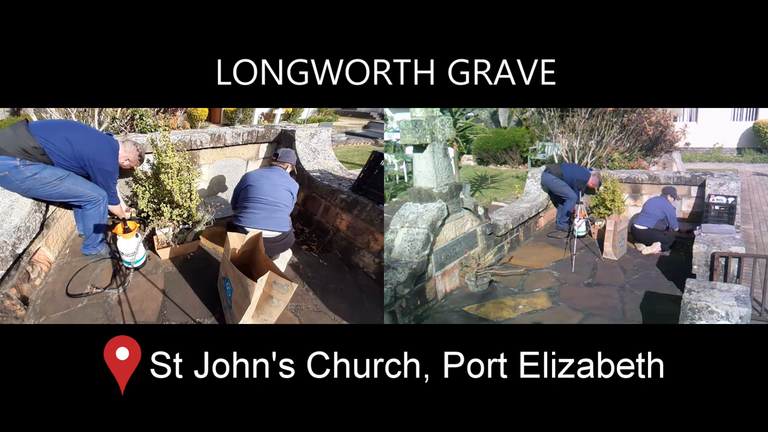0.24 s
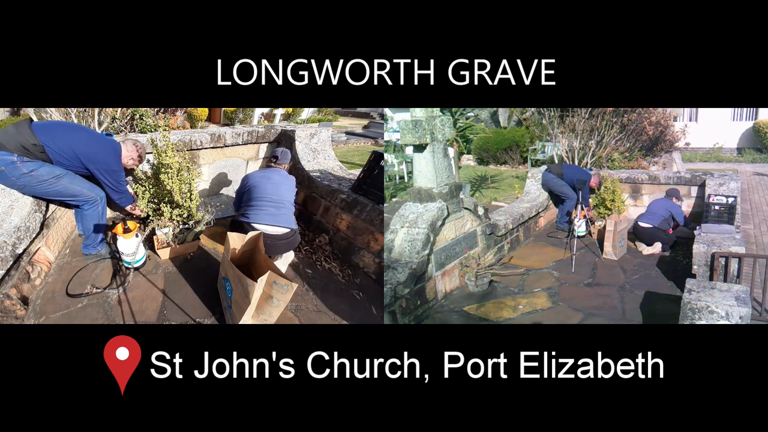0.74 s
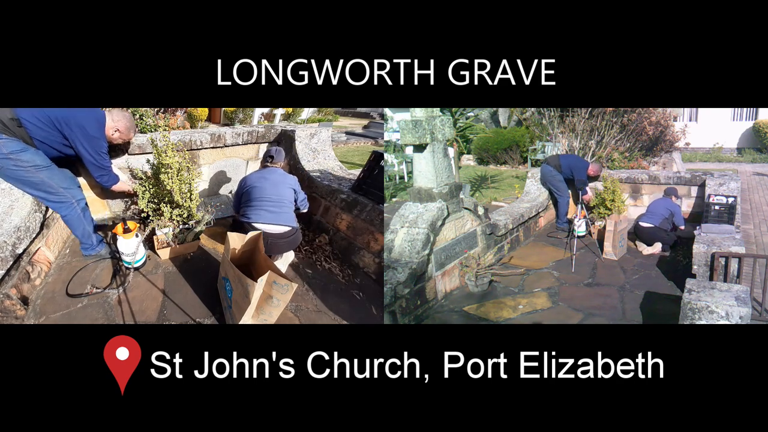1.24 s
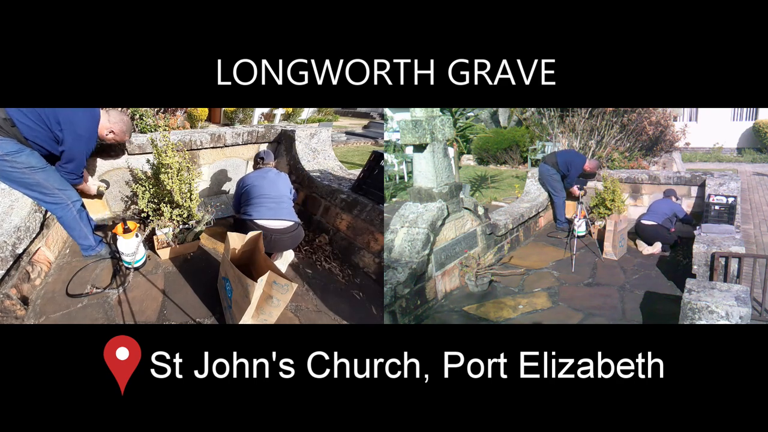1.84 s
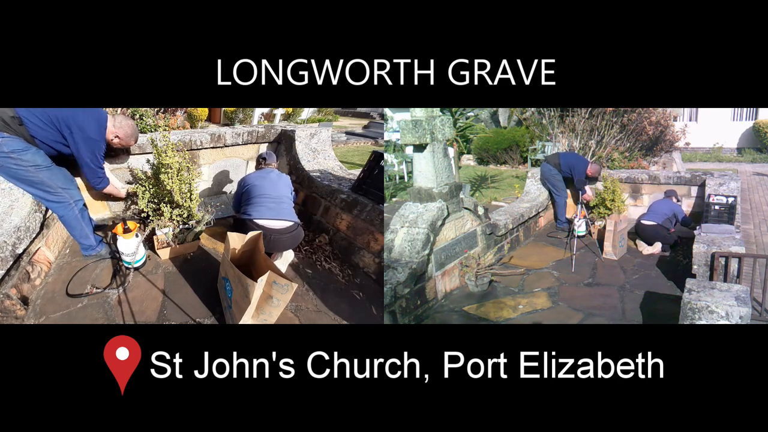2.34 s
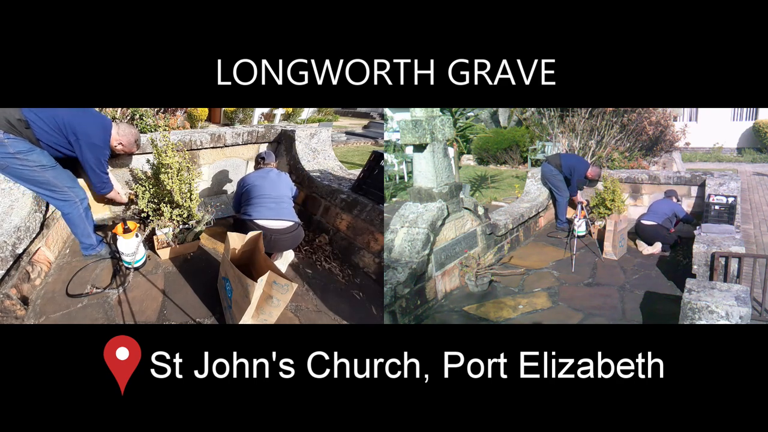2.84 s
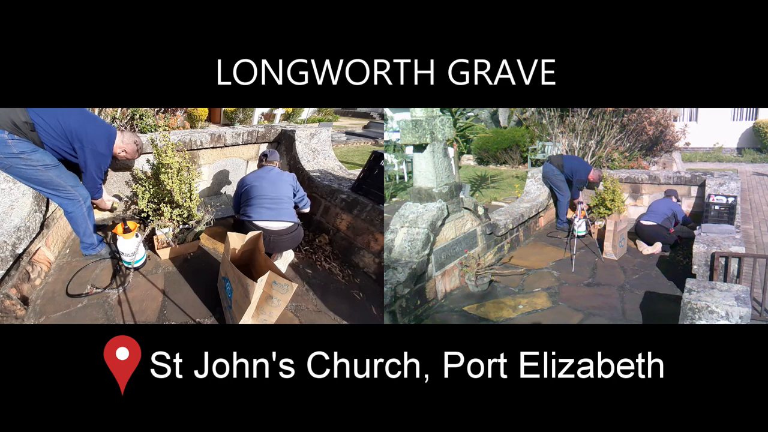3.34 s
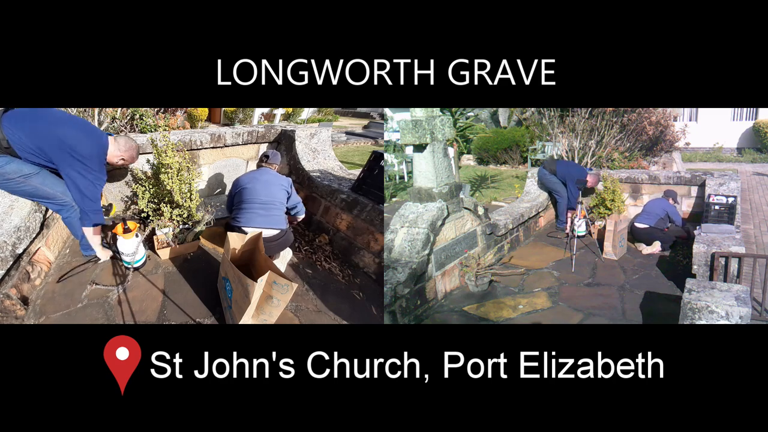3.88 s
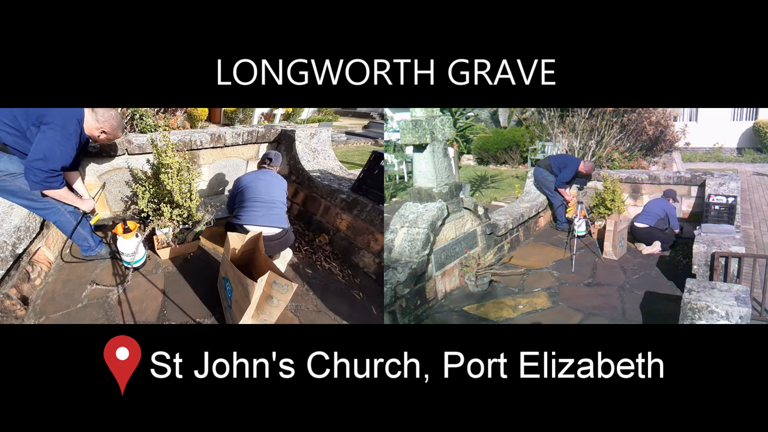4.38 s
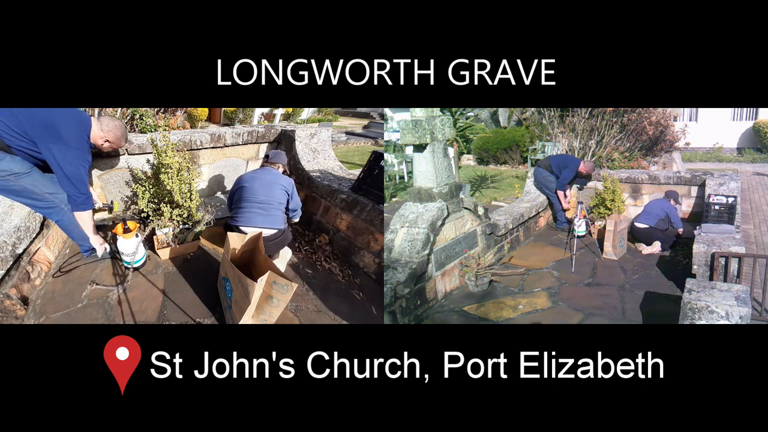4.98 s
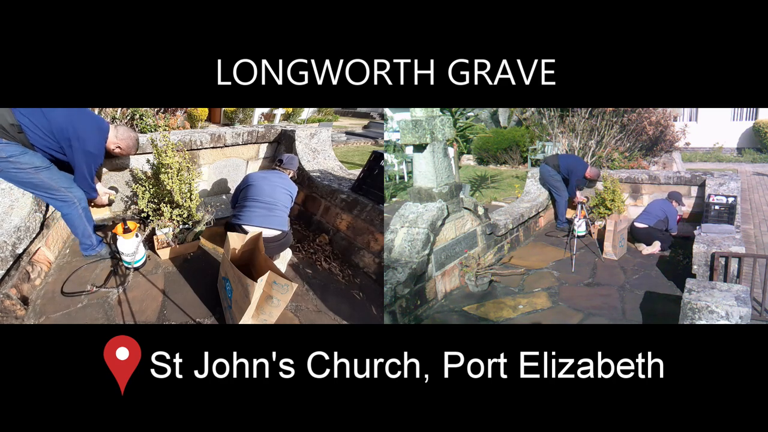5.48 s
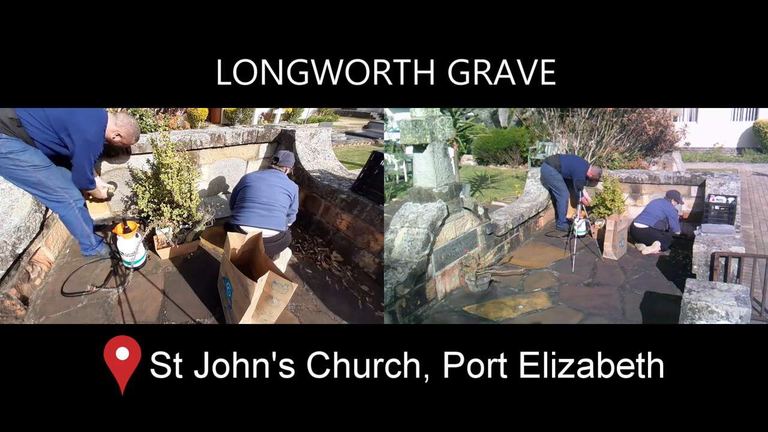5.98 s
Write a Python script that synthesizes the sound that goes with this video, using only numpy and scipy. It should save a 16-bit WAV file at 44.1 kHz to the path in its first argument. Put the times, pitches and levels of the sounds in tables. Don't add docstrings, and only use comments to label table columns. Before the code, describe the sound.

A small handheld electric tool whines and hisses outdoors, cuts out for brisk brush scrubbing and knocks on stone, then starts up again.

```python
import sys
import numpy as np
from scipy import signal
from scipy.fft import rfft, irfft, next_fast_len
from scipy.io import wavfile
from scipy.ndimage import uniform_filter1d

SR = 44100
rng = np.random.default_rng(int(sys.argv[2]) if len(sys.argv) > 2 else 0)


def wrap_up_sound(samples):
    columns = np.atleast_2d(samples).T
    tamed = np.clip(columns, -1, 1)
    steps = np.round(tamed * 32767).astype(np.int16)
    wavfile.write(sys.argv[1], SR, steps)


def attenuation_scalar(level_db):
    decades = np.asarray(level_db, float) / 20
    return 10 ** decades


N = 274302
TIME = np.arange(N) / SR


def evened(x):
    return x / np.sqrt(np.mean(x ** 2) + 1e-20)


def read_curve(points, hz):
    point_hz, value = np.transpose(points)
    return np.interp(np.log(hz + 1), np.log(point_hz + 1), value)


def coloured(x, points):
    size = next_fast_len(N)
    gain = attenuation_scalar(read_curve(points, np.fft.rfftfreq(size, 1 / SR)))
    return irfft(rfft(x, size) * gain, size)[..., :N]


def drift(hz, count):
    steps = rng.standard_normal((count, N // 64 + 2))
    slow = signal.sosfiltfilt(signal.butter(2, hz, fs=SR / 64, output="sos"), steps)
    place = np.arange(N) / 64
    return [np.interp(place, np.arange(len(row)), np.clip(evened(row), -2, 2)) for row in slow]


def held(rows, rise_s, fall_s=None):
    power = np.zeros(N)
    for start_s, length_s, db, *own_fall_s in rows:
        fade_db = -60 * np.maximum(TIME - start_s - length_s, 0) / (fall_s or own_fall_s[0])
        rise = np.clip((TIME - start_s) / rise_s + 1, 0, 1) ** 2
        power += (attenuation_scalar(db + fade_db) * rise) ** 2
    return np.sqrt(power)


def add(mix, start_s, sound):
    part = mix[..., round(start_s * SR):][..., :sound.shape[-1]]
    part += sound[..., :part.shape[-1]]


def alike(pair):
    # frequency_hz, likeness (0-1)
    likeness = [(20, 1), (200, 0.98), (400, 0.99), (800, 0.91), (1500, 0.5), (5000, 0), (9000, 0)]
    size = next_fast_len(N)
    same = np.clip(read_curve(likeness, np.fft.rfftfreq(size, 1 / SR)), 0, 1)
    a, b = rfft(pair, size)
    return irfft([a, same * a + np.sqrt(1 - same ** 2) * b], size)[:, :N]


def to_ports(x, lag_s, count, scatter_db, apart=None):
    # frequency_hz, level_db
    wall_scatter = [(300, -13), (900, -7), (1400, 0), (2200, -7), (2850, -4), (3600, -7), (5000, -5.5),
                    (6500, -1.5), (10000, 5), (16000, 8.5)]
    slip_rad, slip_hz = 1.1, 500
    _, t, direct = signal.stft(x, SR, nperseg=512, noverlap=384)
    hz = np.fft.rfftfreq(512, 1 / SR)[:, None]
    lag_s = np.interp(t, TIME, lag_s)
    slip = slip_rad * hz ** 2 / (hz ** 2 + slip_hz ** 2)
    late = np.exp(-1j * ((2 * np.pi + slip_rad) * hz * lag_s - slip))
    hidden_db = 45000 * (lag_s - 190e-6)
    if apart is None:
        paths = rng.standard_normal((len(t), len(hz), 4)).T
        paths = uniform_filter1d(paths, count, axis=2)
        paths = uniform_filter1d(paths, size=2, axis=1)
        walls = direct * np.exp(1j * np.arctan2(paths[:2], paths[2:]))
    else:
        walls = signal.stft(apart, SR, nperseg=512, noverlap=384)[2]
    walls = walls * attenuation_scalar(read_curve(wall_scatter, hz) + scatter_db + hidden_db)
    return signal.istft(walls + [direct, direct * late], SR, nperseg=512, noverlap=384)[1][:, :N]


def shaft_whine(turns):
    # start_s, length_s, level_db
    presses = [(-.05, .1, -45), (.98, .72, -38), (1.89, .08, -44), (2.22, .14, -43), (2.54, .3, -48),
               (2.95, .56, -39.5), (5.37, .5, -41), (6.08, .2, -41)]
    # start_s, length_s, level_db
    arcing = [(.2, .72, -45.5), (1.02, .16, -48), (1.36, .13, -44), (1.65, .3, -44.5), (2.14, .05, -45),
              (2.45, .3, -49), (3.4, .1, -44.5), (5.31, .42, -44), (5.8, .08, -45), (6.0, .1, -50)]
    # start_s, length_s, level_db
    facing = [(.07, .27, -33.5), (.42, .48, -37), (1.9, .05, -37), (2.14, .06, -37), (2.3, .26, -37),
              (2.72, .26, -38), (3.1, .05, -32.5), (3.26, .22, -35), (5.43, .42, -38)]
    # multiple of shaft speed, level_db under the gears
    mesh_orders = [(4.5, -0.5), (7, -15), (7.5, -17), (8.5, -15), (9, -21)]
    # multiple of shaft speed, level_db under the commutator
    bar_orders = [(14, 9.5), (21, -29.5), (22, -40.5), (5, -18), (14, -24), (18, -6)]
    # multiple of shaft speed, level_db under the fan
    fan_orders = [(28, 0), (28.99, -6), (26.6, -11), (24.74, -13.5), (41.24, -14), (43.1, -12.5)]
    whine = np.zeros(N)
    for orders, rows, rest_db, flicker_db in ((mesh_orders, presses, -49, 1.8),
                                              (bar_orders, arcing, -51.5, 2.0),
                                              (fan_orders, facing, -42, 3.5)):
        part = np.hypot(held(rows, rise_s=.03, fall_s=0.2), attenuation_scalar(rest_db))
        for (multiple, db), chance in zip(orders, drift(16.5, count=len(orders))):
            tone = np.cos(2 * np.pi * (multiple * turns + rng.random()))
            whine += part * attenuation_scalar(db + flicker_db * chance) * tone
    return whine * np.interp(TIME, [3.5, 3.53, 5.29, 5.31], [1, 0, 0, 1])


def cooling_air(turns, shaft_hz):
    # start_s, length_s, level_db
    runs = [
        (-0.05, 3.54, -34.3),
        (3.505, .035, -40),
        (5.303, 0.93, -35),
        (5.31, .06, -38),
    ]
    # frequency_hz, level_db per Hz
    air_hiss = [(180, -58), (300, -22), (502, -24.5), (713, -11.5), (774, -16.5), (885, -10.5), (1010, -10),
                (2360, -9), (2790, -1), (4230, -6), (5430, -2.5), (7320, -6.5), (8500, -11.5),
                (16000, -13.5)]
    # multiple of shaft speed, width_hz, level_db
    humps = [(13.95, 500, -30), (28.27, 1300, -17), (43.04, 900, -11.5)]
    air = evened(coloured(rng.standard_normal((3, N)), air_hiss))
    for multiple, width_hz, db in humps:
        low = signal.butter(2, width_hz / 2, fs=SR, output="sos")
        band = signal.sosfilt(low, rng.standard_normal((2, 3, N)))
        angle = 2 * np.pi * multiple * turns
        air += attenuation_scalar(db) * evened(band[0] * np.cos(angle) + band[1] * np.sin(angle))
    strain_db = -.1 * (shaft_hz - 197) + 0.5 * drift(6, count=1)[0]
    pulse = 1 + 0.14 * np.cos(2 * np.pi * turns)
    return air * held(runs, rise_s=.022, fall_s=.055) * attenuation_scalar(strain_db) * pulse


def tool():
    # time_s, shaft_speed_hz
    speed = [(0, 213), (.12, 196), (.6, 214), (1.25, 198), (1.92, 198), (2.0, 185), (2.32, 195),
             (2.48, 183), (2.72, 196), (2.84, 189), (3.03, 203), (3.37, 187), (3.5, 208), (5.36, 204),
             (5.52, 192), (5.68, 199), (5.76, 189), (6.2, 202)]
    # time_s, lag_us between ports
    swing = [(0, 262), (.15, 198), (.45, 165), (.85, 156), (1.4, 163), (1.62, 225), (1.74, 200),
             (1.92, 255), (2.25, 158), (2.68, 258), (3.0, 163), (3.48, 250), (5.36, 235), (5.68, 250),
             (5.87, 182), (6.0, 238), (6.18, 168)]
    shaft_hz = np.interp(TIME, *np.transpose(speed))
    lag_s = np.interp(TIME, *np.transpose(swing)) / 10 ** 6
    load, chatter = drift(15.57, count=1)[0], drift(48.4, count=1)[0]
    turns = np.cumsum(shaft_hz * (1 + .0045 * load + .0035 * chatter)) / SR
    air = cooling_air(turns, shaft_hz)
    whine = to_ports(shaft_whine(turns), lag_s, count=40, scatter_db=-0.5)
    return whine + to_ports(air[0], lag_s, count=1, scatter_db=-0.5, apart=air[1:])


def brush():
    # start_s, length_s, level_db
    scrub = [(3.745, .11, -74), (3.87, .064, -67), (4.06, .02, -60.5), (4.24, .015, -63), (4.34, .02, -68),
             (4.415, .025, -59.5), (4.56, .015, -62), (4.795, .015, -55.5), (4.93, .04, -59),
             (5.095, .085, -55), (5.265, .02, -61)]
    # start_s, length_s, level_db, dying_60_db_s
    sweeps = [(3.745, .11, -80, .04), (3.87, .066, -60, .04), (4.065, .5, -56.3, .15),
              (4.57, .15, -54, .15), (4.76, .1, -52, .8), (5.1, .08, -54, .13)]
    # frequency_hz, level_db per Hz
    fizz_colour = [(1500, -50), (2500, -36), (3700, -23), (7500, -8.5), (12000, 0), (16500, 1)]
    # frequency_hz, level_db per Hz
    scrape_colour = [(500, -39.5), (1200, -4), (2500, 6.5), (6000, 8.5), (10000, -12), (16000, -24.5)]
    splay_db = 4
    press = held(scrub, rise_s=.035, fall_s=.14)
    grains = rng.standard_normal((2, 2, N)) * attenuation_scalar(0.63 * rng.exponential(1, N))
    moving = np.hypot(held(sweeps, rise_s=.008), attenuation_scalar(splay_db) * press)
    fizz = evened(coloured(alike(grains[0]), fizz_colour)) * (attenuation_scalar(5.7) * moving + attenuation_scalar(-68.5))
    scrape = evened(coloured(alike(grains[1]), scrape_colour)) * (attenuation_scalar(3.0) * press + attenuation_scalar(-89))
    return (fizz + scrape) * (TIME > 3.742) * (TIME < 5.29)


def struck(modes, size, blow):
    t = np.arange(9000) / SR
    ring = sum(attenuation_scalar(db - 60 * t / t60_s) * np.sin(2 * np.pi * hz * size * t) for hz, db, t60_s in modes)
    sound = signal.fftconvolve(ring, blow)[:9000]
    return sound / abs(sound).max()


def tank_bumps(mix):
    # time_s, peak_db, thud_db under it
    bumps = [(0.972, -24, -13), (3.544, -41, -37), (5.499, -41, -20), (5.796, -34.5, -19),
             (5.873, -36.5, -17), (6.068, -35, -20)]
    # frequency_hz, level_db, t60_s
    tank = [(725, -3, 0.11), (605, -14.5, 0.052), (454, -40.5, 0.043), (960, -12, 0.023),
            (1730, -13, 0.037), (2790, -14, .04)]
    t = np.arange(9000) / SR
    for hit_s, db, thud_db in bumps:
        blow = rng.standard_normal(700) * np.hanning(700) * (rng.random(700) < .03)
        thud = np.sin(2 * np.pi * 260 * t) * attenuation_scalar(thud_db - 60 * t / 0.075)
        add(mix, hit_s - .006, attenuation_scalar(db) * (struck(tank, 0.99, blow) + thud))


def dull_knocks(mix):
    # time_s, peak_db, size factor on pitch, snap_db
    knocks = [(3.544, -31, 1.5, -6), (3.572, -43, 1.3, -50), (3.606, -44.5, 1.3, -50),
              (3.844, -47, 1.01, -19), (4.758, -57, 1.1, 4), (4.964, -27.5, 1.06, -28),
              (5.024, -38.5, 1.15, -20), (5.063, -31.5, 1.4, -2), (5.095, -39, 0.78, -12),
              (5.264, -43.5, 1.1, -4.5), (5.292, -34.5, 1.01, -9.5)]
    # frequency_hz, level_db, t60_s
    wood = [(500, 0, .035), (640, -2, .03), (950, -4, .02), (1230, -1, .02), (1600, 0, .02),
            (1950, -2, .018), (2450, -3, .014), (3000, -6, .012), (3600, -9, .01)]
    t = np.arange(9000) / SR
    bright = signal.butter(2, [2500, 14000], "bandpass", fs=SR, output="sos")
    dull = signal.butter(2, [450, 3500], "bandpass", fs=SR, output="sos")
    for hit_s, db, size, snap_db in knocks:
        blow = rng.standard_normal(900) * np.hanning(900) ** 3 * (rng.random(900) < .1)
        grit = signal.sosfilt(bright, rng.standard_normal(9000))
        snap = grit * np.exp(-abs(t - .011) / np.where(t < .011, .002, .006)) / 0.7
        blow = signal.sosfilt(dull, blow)
        add(mix, hit_s - .008, attenuation_scalar(db) * (struck(wood, size, blow) + attenuation_scalar(snap_db) * snap))


def hits():
    mix = np.zeros(N)
    tank_bumps(mix)
    dull_knocks(mix)
    return to_ports(mix, np.full(N, 40e-6), count=30, scatter_db=6.5)


def groans():
    # start_s, length_s, pitch_hz, glide factor, level_db
    drags = [(0.998, .7, 297, 1.13, -59.5), (1.3, 0.23, 660, 1.02, -56.5), (1.92, .08, 151, 1.2, -55),
             (2.001, 0.15, 224, 1.14, -50), (2.061, 0.078, 414, 1.01, -53), (2.31, 0.13, 197, 1.04, -52.5),
             (2.43, 0.14, 206, 0.96, -56), (2.428, 0.12, 415, 1.04, -53), (2.45, .08, 322, 1.01, -53),
             (2.561, 0.1385, 228.5, 1.04, -53.5), (2.589, 0.1, 294, 1.01, -55),
             (3.117, .1, 243, 0.98, -56.5), (4.0, 0.23, 203.4, 0.92, -59)]
    mix, waver = np.zeros(N), drift(25, count=1)[0]
    for start_s, length_s, hz, glide, db in drags:
        share = np.linspace(0, 1, round(length_s * SR))
        tone = np.sin(2 * np.pi * np.cumsum(hz * glide ** share) / SR)
        add(mix, start_s, attenuation_scalar(db + 0.5) * tone * signal.windows.tukey(len(share), .6))
    return mix * attenuation_scalar(1.9 * waver)


def traffic():
    # frequency_hz, level_db per Hz
    road = [(15, -17), (30, -7), (56, 1.5), (90, -10), (220, -19), (400, -24), (900, -26.5), (1600, -32.5),
            (2600, -46.5), (5000, -59), (8000, -64.5), (16000, -59)]
    # time_s, half_width_s, level_db
    swells = [(.95, .08, 4), (2.0, .7, 3.5), (3.67, .06, -2.5), (5.6, .2, -1.5)]
    rumble = evened(coloured(alike(rng.standard_normal((2, N))), road))
    swell_db = sum(db * np.exp(-((TIME - peak_s) / width_s) ** 2) for peak_s, width_s, db in swells)
    swell_db = swell_db + 1.3 * drift(4.9, count=1)[0]
    return attenuation_scalar(-48 + swell_db) * rumble


def scene():
    return tool() + brush() + traffic() + groans() + hits()


def top_cut(x):
    return signal.sosfilt(signal.butter(12, 17070, fs=SR, output="sos"), x)


def record(dry):
    # frequency_hz, level_db
    widen = [(100, 10), (900, 7.5), (3000, -2.5), (7000, -0.5), (11000, 0), (16000, -0.5)]
    mid = (dry[0] + dry[1]) / 2
    side = coloured((dry[0] - dry[1]) / 2, widen)
    side = np.roll(side, round(.014 * SR))
    edge = signal.firwin(511, 15900, window=("kaiser", 10), fs=SR)[None]
    mix = signal.oaconvolve([mid + side, mid - side], edge, "same", axes=1)
    return top_cut(mix)


dry = scene()
out = record(dry)
wrap_up_sound(out)
```